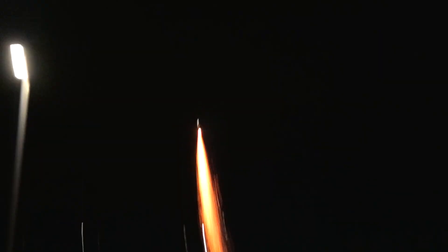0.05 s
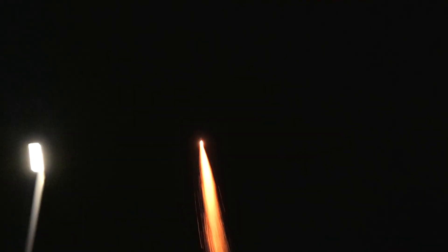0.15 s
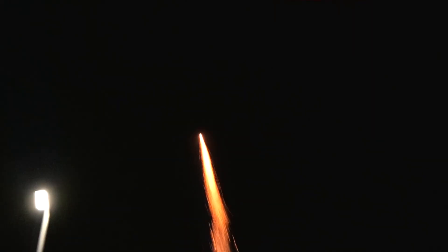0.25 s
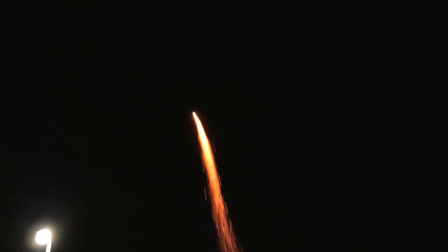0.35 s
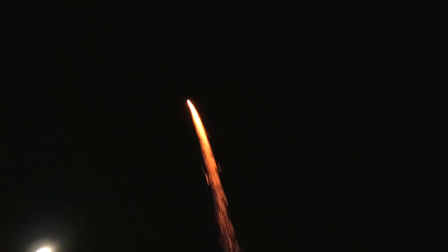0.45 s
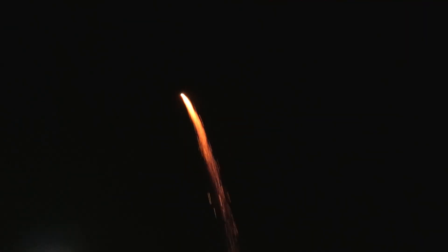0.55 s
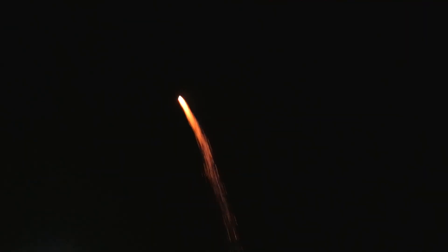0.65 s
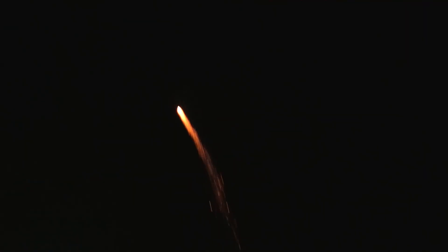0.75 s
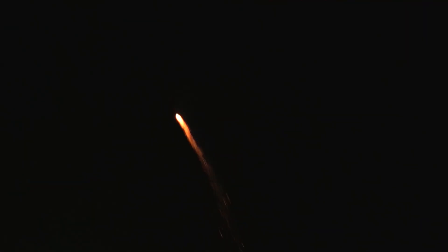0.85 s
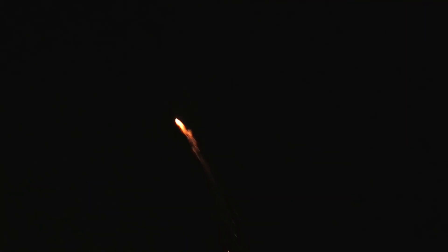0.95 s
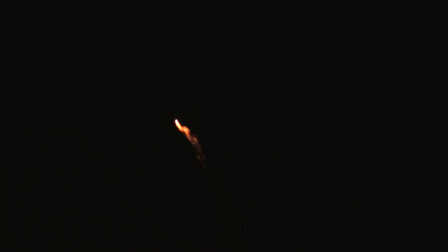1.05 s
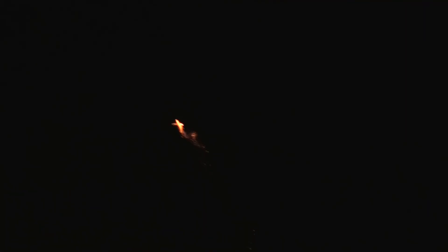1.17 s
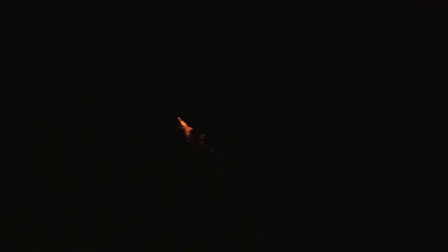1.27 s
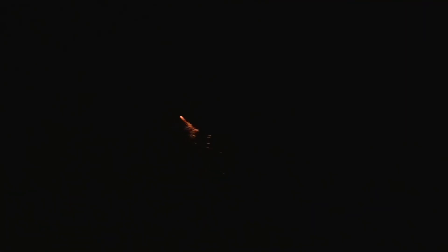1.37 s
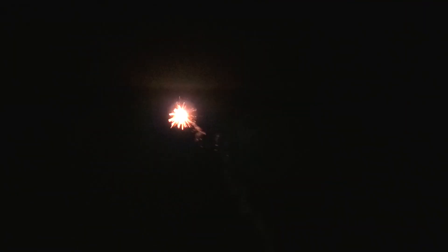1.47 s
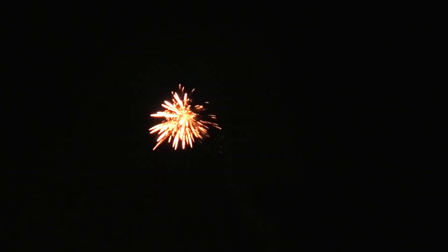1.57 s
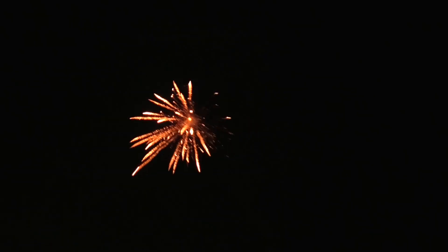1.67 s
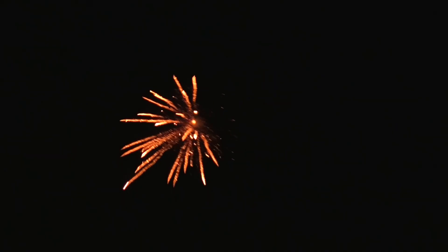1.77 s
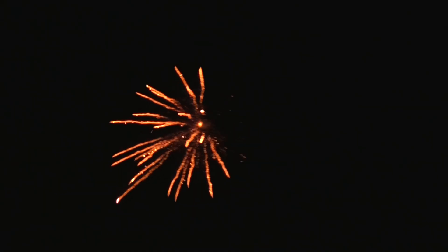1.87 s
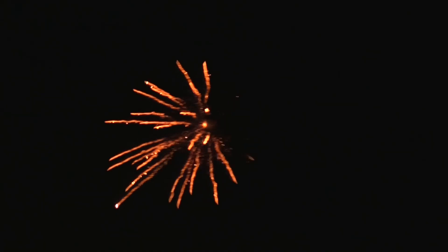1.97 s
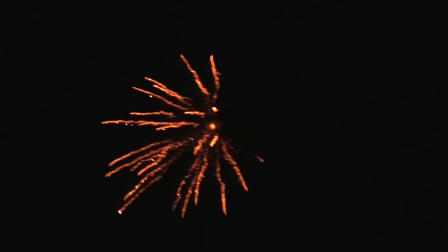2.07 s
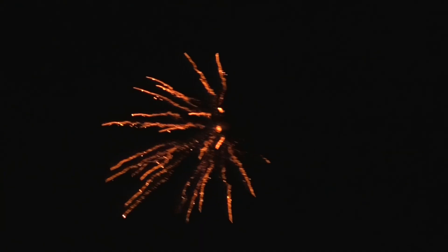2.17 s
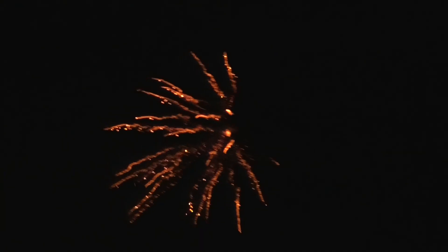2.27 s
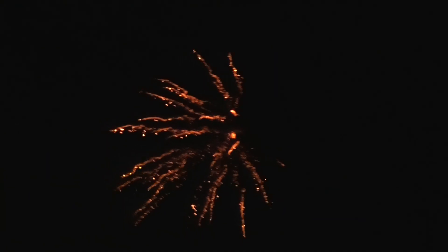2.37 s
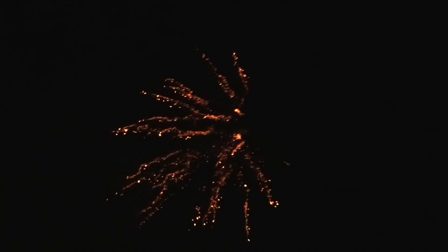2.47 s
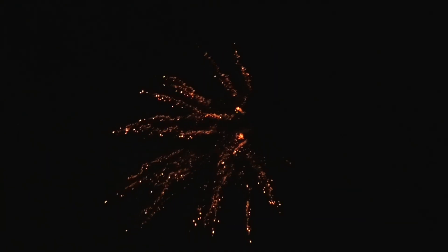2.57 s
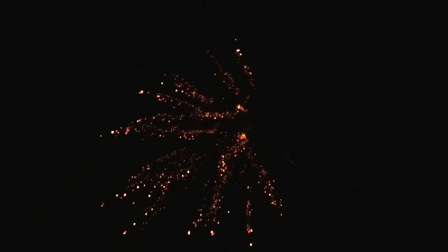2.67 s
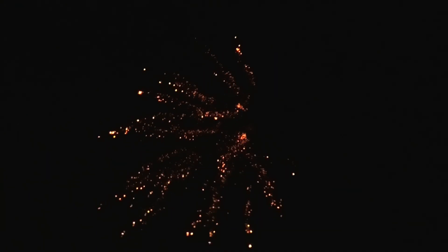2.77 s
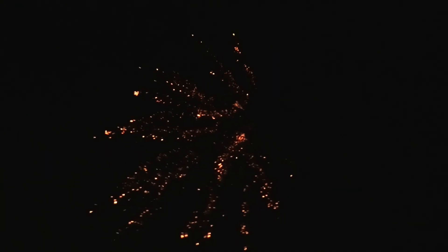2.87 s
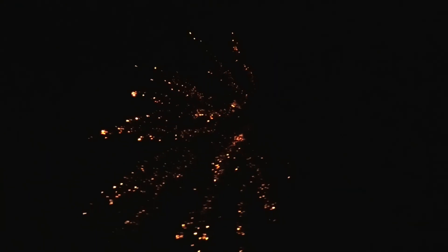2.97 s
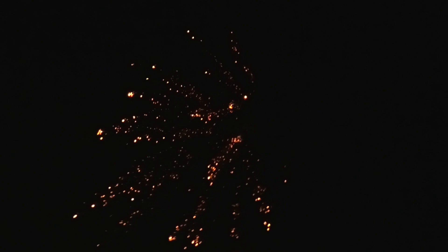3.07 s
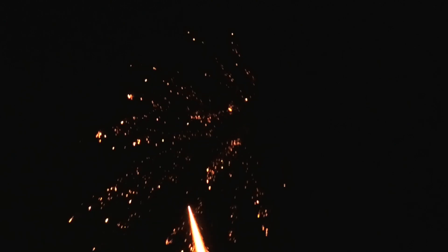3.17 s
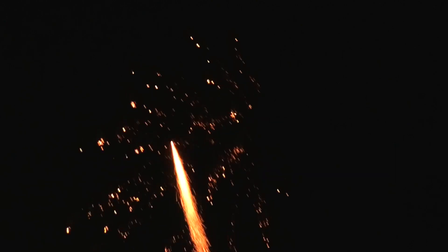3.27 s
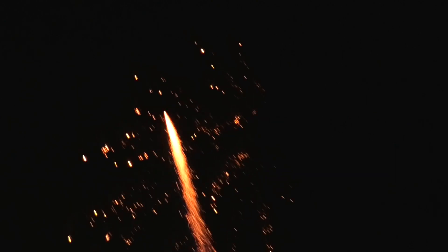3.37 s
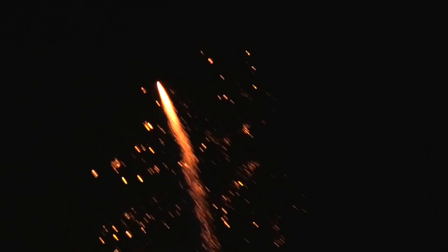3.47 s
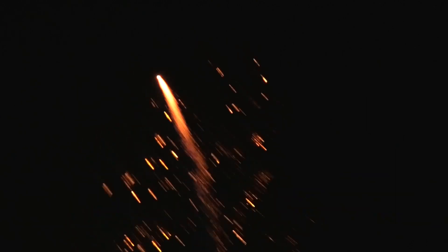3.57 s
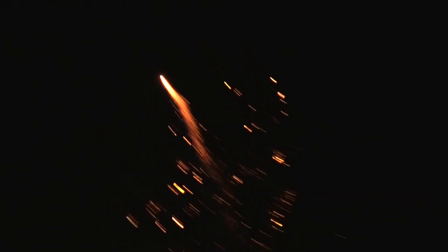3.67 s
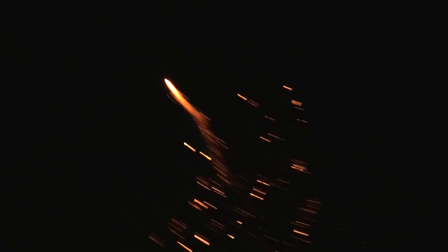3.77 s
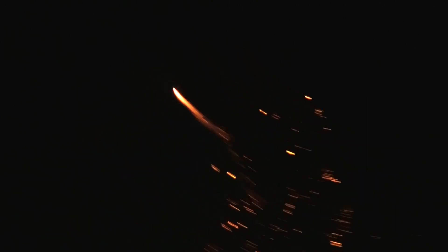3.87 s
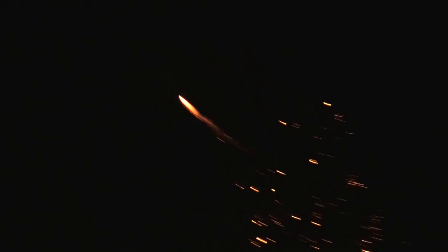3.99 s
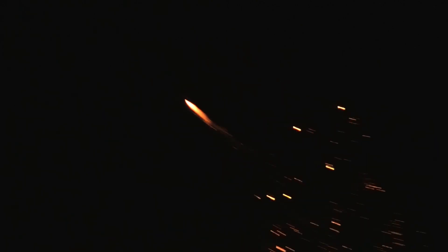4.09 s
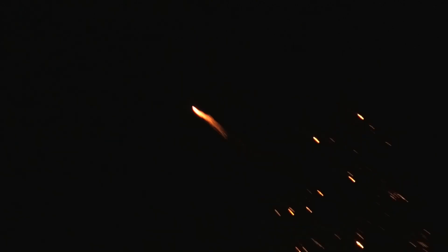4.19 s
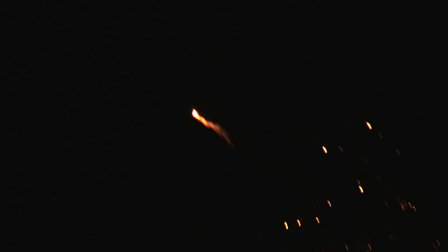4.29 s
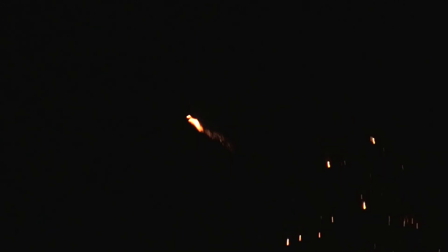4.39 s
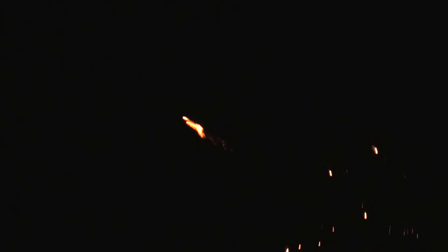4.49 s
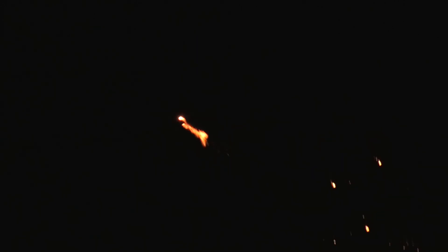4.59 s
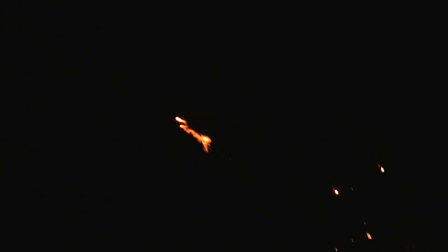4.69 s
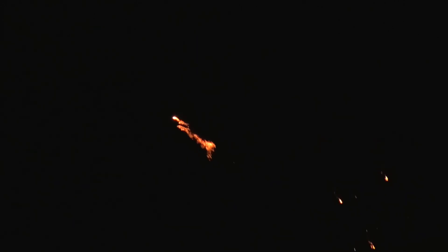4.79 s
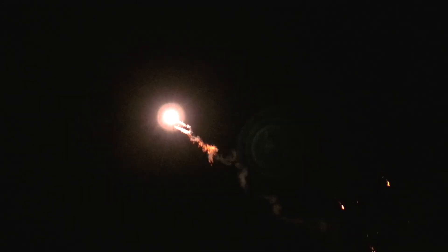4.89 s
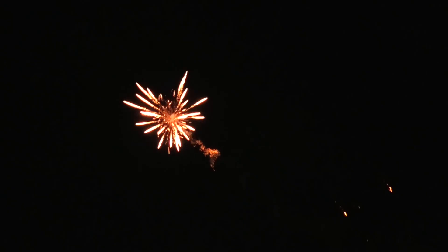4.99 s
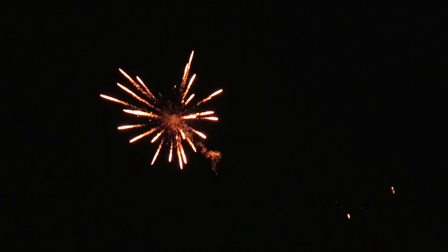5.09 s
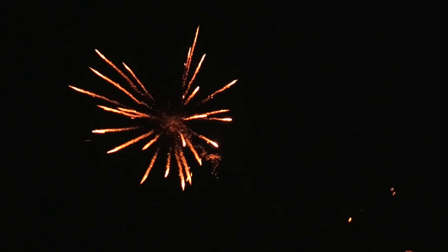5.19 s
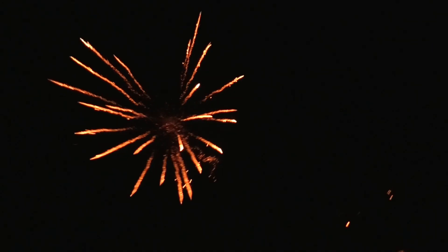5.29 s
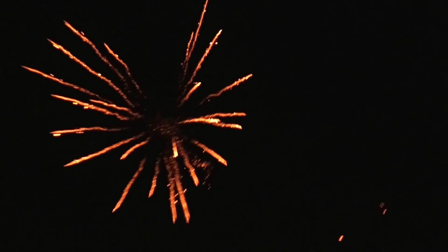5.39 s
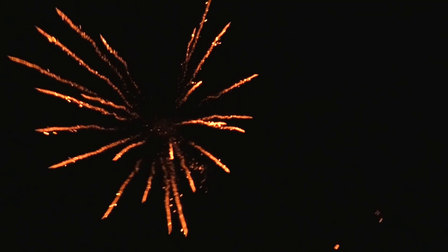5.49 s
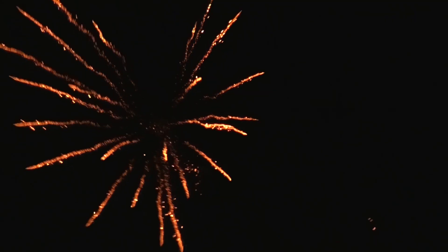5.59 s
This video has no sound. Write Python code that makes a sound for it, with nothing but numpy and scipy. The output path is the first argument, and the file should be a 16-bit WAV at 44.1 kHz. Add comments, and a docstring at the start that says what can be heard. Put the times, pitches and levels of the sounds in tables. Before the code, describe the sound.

Outdoor night fireworks through one wind-rocked microphone, the same on both sides. At 0 s a rocket's bright sizzling exhaust jumps to full strength, holds for about half a second, then fades quickly by 0.9 s, leaving faint town hum, low wind rumble and weak puffs of hiss. At 1.6 s a shell bursts overhead: an abrupt, heavily clipped bang that briefly chokes the input, followed by irregular pops and wall slaps until about 2.1 s and a rolling echo that loses treble. From 2.4 s another rocket rises out of the tail, its whoosh sweeping upward to a loud peak near 2.9 s; a soft low tone dips briefly at 3.15 s. The patchy hiss surges again near 3.5 and 3.8 s, then thins by 4.7 s, with small pops around 4.35 and 4.57 s. At 5.04 s a second distorted bang cracks, with sharp returns and dull rumble continuing to the cut around 5.6 s.

```python
"""A town at night, heard through one wind-rocked microphone as skyrockets go up.
Exhausts are patchy coloured noise, their surges whoosh as gliding noise bands, and a low tone falls briefly.
Two shells burst overhead and clip the input; each rolls back from walls and houses as noise that dulls.
Lone pops are single pressure cycles; wind and town hum are noise with shaped spectra."""
import sys
import numpy as np
from scipy import signal
from scipy.fft import rfft, irfft, next_fast_len
from scipy.io import wavfile
from scipy.ndimage import uniform_filter1d, minimum_filter1d, map_coordinates

SR = 44100
rng = np.random.default_rng(int(sys.argv[2]) if len(sys.argv) > 2 else 0)


def to_wav(sig):
    """Store sig (one row per channel, or 1-D mono) as 16-bit WAV at the path in sys.argv[1].

    Samples outside -1..1 are clipped; the rate is SR.
    """
    pcm = np.clip(np.atleast_2d(sig), -1, 1) * 32767
    pcm = np.round(pcm).astype(np.int16)
    wavfile.write(sys.argv[1], SR, pcm.T)  # frames by channels


N = 248706

# bursts overhead: (start [s], shock front [ms], push [ms], swing size [full scale], swing decay [ms],
# recoil size [full scale])
OVERHEAD_BURSTS = [(1.61706, .45, .97, 21, 8, .88), (5.03705, .38, 1.12, 6, 11, .62)]
# surges as a rocket pulls away: (peak [s], rise [s], fall [s], hiss swell [dB], whoosh peak level [dB],
# whoosh centre at the peak [Hz], glide [octaves per s])
ROCKET_SURGES = [(0.251, .09, 0.33, 3, -45, 3550, -1.5), (2.872, .15, 0.048, 6, -20, 3000, 7.5),
                 (3.555, .12, 0.13, 8.5, -35, 2600, 4), (3.788, 0.1346, 0.35, 2.5, -20, 9940, -0.9),
                 (3.95, 0.19, 0.84, 3.5, -34, 3540, -0.6)]


def amp(db):
    """Decibels to amplitude."""
    return 10 ** (np.asarray(db) / 20)


def unit(x):
    """Scale to an rms of 1."""
    return x / np.sqrt(np.mean(x ** 2) + 1e-20)


def along(points, hz):
    """Read (frequency [Hz], value) points on a log frequency axis."""
    f, v = np.transpose(points)
    return np.interp(np.log(hz + 1), np.log(f + 1), v)


def curves(spans):
    """One value per sample for each column; the first column is silent outside the spans."""
    knots_s, *columns = np.transpose(np.vstack(spans))
    t = np.arange(N) / SR
    columns = [np.interp(t, knots_s, column) for column in columns]
    # each span holds on for 1/18 s after its last point
    on = np.any([(t >= rows[0][0]) & (t <= rows[-1][0] + 1 / 18) for rows in spans], axis=0)
    return [np.where(on, columns[0], -200)] + columns[1:]


def filtered(x, response):
    """Multiply the spectrum by a complex response of frequency."""
    m = next_fast_len(N + SR // 2)
    return irfft(rfft(x, m) * response(np.fft.rfftfreq(m, 1 / SR)), m)[:N]


def rush(spectrum, patchy_db, grain_db=0):
    """Coloured noise of rms 1 with patches of random gain and, if grainy, spiky samples."""
    grain = rng.standard_normal(N // 64 + 1).repeat(64)[:N]
    spiky = rng.standard_normal(N) * amp(grain_db * grain)
    z = signal.stft(spiky, nperseg=512)[2]
    patches = uniform_filter1d(rng.standard_normal(z.shape), size=8, axis=0)
    patches = uniform_filter1d(patches, size=8, axis=1)
    x = signal.istft(z * amp(patchy_db * unit(patches)), nperseg=512)[1][:N]

    def colour(hz):
        outside = (hz < spectrum[0][0]) | (hz > spectrum[-1][0])
        return amp(along(spectrum, hz) - 90 * outside)
    return unit(filtered(x, colour))


def wobble(rate):
    """A smooth random curve with rate knots a second."""
    knots = rng.standard_normal(int(N * rate / SR) + 4)
    return map_coordinates(knots, [np.arange(N) * rate / SR])


def away(peak_s, rise_s, fall_s):
    """Squared distance from a peak: 0 on it, 1 one rise before or one fall after."""
    t = np.arange(N) / SR - peak_s
    return np.where(t < 0, t / rise_s, t / fall_s) ** 2


def layers(level_db, roar_db, hiss_db):
    """Power of hiss, roar, sizzle and fizz: a jet that gains roar loses top."""
    # 0.31 dB of fizz lost per dB of roar, up to 11 dB of roar
    fizz_db = -1.5 - 0.31 * np.minimum(roar_db, 11)
    return amp(level_db + np.array([hiss_db - 3, roar_db - 3.5, np.full(N, 1.06), fizz_db])) ** 2


def jets():
    """Turbulent exhaust; its mirror in the ground cuts a comb of notches, deepest before lift-off."""
    # each volley in flight, before fixed layer trims: (time [s], sizzle level [dB],
    # roar over sizzle [dB], hiss over sizzle [dB])
    volleys = [
        [(0, -27, -2.5, 1.5), (.042, -18, -3, -1), (.254, -19.5, -3, -1.5), (.516, -24.5, -3, 0.5),
         (.664, -31.5, 5.5, 4), (.78, -46, 13.5, 5.5), (.87, -56.5, 13, 3), (.96, -66, 15, 4),
         (1.1, -61, 10, -3)],
        [(2.3, -87, 4, 6), (2.42, -51, 9, 9), (2.6, -35, 5, 8), (2.69, -22.5, 1, 4.5), (2.85, -17, -2.5, 0),
         (3.0, -23, -2, 2), (3.15, -19.5, -5.5, -1.5), (3.43, -25, -0.5, 3), (3.52, -19.5, 2, -0.5),
         (3.66, -22, -1.5, 1), (3.8, -26, 3.5, 1.5), (4.0, -27.5, 0, 0.5), (4.33, -28.5, 1, -0.5),
         (4.42, -32, 1.5, 2), (4.5, -31, 0, 3.5), (4.61, -36.5, 8.5, 2), (4.72, -50.5, 14.5, 2.5),
         (4.95, -63.5, 7, 2)],
    ]
    # faint far puffs of exhaust, before the same trims: (peak [s], rise from 20 dB under the peak [s],
    # fall to 20 dB under it [s], sizzle level [dB], roar over sizzle [dB], hiss over sizzle [dB])
    puffs = [(1.19, 0.065, 0.11, -45, 12, 8.5), (1.37, 0.16, 0.15, -54.5, 2.7, 4),
             (1.52, 0.11, 0.12, -46, 2.6, 1)]
    # strength of the mirror in the ground: (time [s], strength [0-1])
    ground_mirror = [(2.2, 0), (2.3, .85), (2.64, 0.44), (2.76, 0.17)]
    # colours of the four exhaust layers: (frequency [Hz], relative level [dB])
    hiss_colour = [(1500, -14), (2400, -3), (5500, -10), (7500, -29)]
    roar_colour = [(90, -37), (250, -14), (500, -10), (1000, -3.5), (2000, -6.5), (2800, -11)]
    sizzle_colour = [(4500, -7.5), (6000, -2), (9000, 0), (11000, -27)]
    fizz_colour = [(7500, -47), (9500, -2.5), (12000, -4.5), (14000, -12), (16000, -17)]

    power = layers(*curves(volleys))
    for s, rise, fall, db, roar_db, hiss_db in puffs:
        power = power + layers(db - 20 * away(s, rise, fall), np.full(N, roar_db), np.full(N, hiss_db))
    hiss, roar, sizzle, fizz = np.sqrt(power)
    swell_db = sum(db * np.maximum(1 - away(s, rise, fall), 0) for s, rise, fall, db, *_ in ROCKET_SURGES)
    jet = hiss * amp(swell_db) * rush(hiss_colour, 1.1, grain_db=1.0)
    jet = jet + roar * rush(roar_colour, 0.42)
    jet = jet + sizzle * rush(sizzle_colour, 0.94, grain_db=0.5)
    jet = jet + fizz * rush(fizz_colour, 1.1, grain_db=0.5)
    mirror = np.clip(np.interp(np.arange(N) / SR, *np.transpose(ground_mirror)), 0, 1)
    mirror_delay_s = 0.00156
    comb = jet + mirror * np.roll(jet, round(mirror_delay_s * SR))
    return comb / np.sqrt(1 + mirror ** 2)


def town():
    """The town's steady hum: low-heavy noise at one level throughout."""
    # colour of the hum: (frequency [Hz], relative level [dB])
    hum_colour = [(59, -9), (100, -10), (244, -17), (1060, -11.5), (1390, -16.5), (1800, -19), (4200, -24),
                  (8110, -28), (11000, -40), (16000, -65)]
    return amp(-48.5) * rush(hum_colour, 0.85)


def wind():
    """Gusts rock the membrane mostly below hearing, rumble and flutter above; lost while a burst drives it."""
    # gusts between the bursts: (time [s], rumble [dB], rocking over rumble before smoothing and stop [dB],
    # flutter over rumble before its wobble [dB])
    gusts = [
        [(0, -27, 24.5, 3), (.082, -36, 15.5, -7), (.35, -52, 27, -10), (.7, -44, 13.5, -8),
         (1.1, -40, 13.5, -28), (1.55, -32, 11, -14)],
        [(1.78, -47, 42, -6), (2.05, -39.5, 23.5, 1.5), (2.34, -26.5, 19, -12), (2.59, -29, 26.5, -2.5),
         (2.9, -59.5, 19, 5), (3.1, -54.5, 22.5, 2), (3.45, -47, 21, -20), (3.54, -36, 18, 0),
         (3.64, -45.5, 17, -8), (4.2, -37.5, 18, -16), (4.5, -30.5, 3, -21), (4.65, -47, 24.5, -9),
         (4.84, -34.5, 23.5, -27), (4.96, -34, 27, -17)],
        [(5.18, -37.5, 29, -17), (5.3, -45, 20, -12), (5.46, -33.5, 21, -7), (5.64, -35.5, 17, -21)],
    ]
    # colours of rocking, rumble and flutter: (frequency [Hz], relative level [dB])
    rock_colour = [(2, -6), (5, 2.5), (10, -5), (20, -16), (30, -45)]
    rumble_colour = [(18, -26), (30, -1.5), (60, -5), (120, -23)]
    flutter_colour = [(60, -10), (95, 1), (200, -6.5), (300, -16)]

    gust_db, rock_db, flutter_db = curves(gusts)
    rock = uniform_filter1d(amp(gust_db + rock_db), size=SR // 25) * rush(rock_colour, 0)
    flutter = amp(flutter_db + wobble(8.7)) * rush(flutter_colour, 2.2)
    stop = 0.43  # the membrane stiffens near its stop
    return stop * np.tanh(rock / stop) + amp(gust_db) * (rush(rumble_colour, 1.3) + flutter)


def whoosh():
    """Noise shifted up to a gliding centre; a high whoosh gets a wider band."""
    t, out = np.arange(N) / SR, np.zeros(N)
    for s, rise, fall, _, db, centre_hz, glide in ROCKET_SURGES:
        moving_hz = centre_hz * 2 ** (glide * np.clip(t - s, -rise, fall))
        turn = 2 * np.pi * np.cumsum(moving_hz) / SR
        width_hz = 350 if centre_hz < 6000 else 1300
        low_band = [(5, 0), (width_hz, 0), (2 * width_hz, -20)]
        band = sum(rush(low_band, 0) * wave(turn) for wave in (np.cos, np.sin))
        # 26 dB under its peak at both ends
        out = out + amp(db - 26 * away(s, rise, fall)) * band
    return out


def pops():
    """Each pop is one pressure cycle, front first, rounded by the distance."""
    # single pops, from lone walls and farther shells: (start [s], level before a shared lift [dB], pitch [Hz])
    lone_pops = [(1.4364, -36, 560), (1.7267, -6, 684), (1.7479, -12, 520), (1.7691, -17, 840),
                 (1.7786, -9, 556), (1.854, -20, 750), (1.892, -12, 860), (1.937, -18, 564),
                 (1.991, -15, 650), (2.0984, -20, 390), (2.4636, -16, 1700), (2.541, -15, 790),
                 (4.3516, -8.5, 650), (4.3643, -19.5, 696), (4.5678, -22.5, 695), (5.162, -11, 1200),
                 (5.17, -15, 700), (5.201, -17, 1110), (5.252, -19, 1490), (5.4788, -21, 2540)]
    out, t = np.zeros(N + SR), np.arange(SR // 100) / SR
    lift_db = 5
    for s, db, hz in lone_pops:
        cycles = hz * t
        swing = np.sin(2 * np.pi * cycles ** 1.02)
        rounded_front = np.tanh(cycles / 0.27)
        fade = np.exp(-(cycles / 1.08) ** 4)
        out[round(s * SR):][:len(t)] -= amp(db + lift_db) * swing * rounded_front * fade
    return out[:N]


def bursts():
    """Shock front, push, then the slow swing and recoil of the overloaded capsule."""
    # first returns off the ground, strong enough to leave the rail: (start [s], length [ms])
    ground_returns = [(1.6278, .16), (1.62835, .17), (5.04875, .62)]
    t = np.arange(N) / SR
    push_size = 40  # far over full scale
    out = sum(push_size * ((t >= s) & (t < s + ms / 1000)) for s, ms in ground_returns)
    for s, front_ms, push_ms, swing, swing_ms, recoil in OVERHEAD_BURSTS:
        u = np.maximum(t - s, 0)
        slow = recoil * np.exp(-u / .12) - swing * np.exp(-1000 * u / swing_ms)
        push = push_size * ((u > front_ms / 1000) & (u < (front_ms + push_ms) / 1000))
        out = out + (t >= s) * (slow + push)
    return out


def roll_level():
    """Near walls answer at once and die fast, the houses arrive later, the far town swells and lingers."""
    # rolling echoes, before the overall lift: (start [s], near walls [dB], houses at full level [s],
    # houses [dB], far town [dB])
    rolls = [(1.634, -18.5, 1.725, -25, -26.5), (5.045, -18, 5.14, -24.5, -28.5)]
    near_db_per_s, houses_db_per_s, far_db_per_s = 152, 65, 2.5
    far_swell_s, roll_s = .12, 1.6
    houses_rise_s, houses_hold_s = 0.034, 0.025
    t, power = np.arange(N) / SR, np.zeros(N)
    for s, near_db, houses_s, houses_db, far_db in rolls:
        u = np.maximum(t - s, 0)
        near = (t >= s) * amp(near_db - near_db_per_s * u)
        rise = np.clip(1 + (t - houses_s) / houses_rise_s, 0, 1)
        houses = rise * amp(houses_db - houses_db_per_s * np.maximum(t - houses_s - houses_hold_s, 0))
        far = amp(far_db - far_db_per_s * u - 20 * (u / roll_s) ** 8) * np.tanh((u / far_swell_s) ** 2)
        power = power + near ** 2 + houses ** 2 + far ** 2
    lumps_db = 1.07 * wobble(18)
    return np.sqrt(power) * amp(lumps_db)


def echoes():
    """Many walls return each burst: dense grains that lose treble with the length of their path."""
    # colour of the early echoes: (frequency [Hz], relative level [dB])
    blast_colour = [(59, -57), (100, -10), (721, 1.5), (1150, -7), (1550, -6), (1830, -11.5), (3700, -17),
                    (4870, -18), (10200, -21), (16000, -37)]
    # air dulls late echoes: (frequency [Hz], loss [dB per s])
    air_loss = [(100, 14.5), (1000, 4), (3500, 10), (8000, 45.5), (12000, 64), (16000, 120)]
    hz, t, z = signal.stft(rush(blast_colour, 1.16, grain_db=1.5), SR, nperseg=256)
    # time since the latest burst; 9 s stands for none yet
    since = np.min([np.where(t >= s, t - s, 9) for s, *_ in OVERHEAD_BURSTS], axis=0)
    dulled = z * amp(-along(air_loss, hz)[:, None] * since)
    roll = signal.istft(dulled, SR, nperseg=256)[1][:N]
    return amp(3.5) * roll_level() * roll


def hoot():
    """One brief soft low sine whose pitch falls."""
    middle_s, half_s, middle_hz, fall_hz_per_s = 3.158, 0.06, 108.4, 570
    u = np.arange(N) / SR - middle_s
    level_db = -34 - 25 * (u / half_s) ** 2
    return amp(level_db) * np.sin(2 * np.pi * (middle_hz - fall_hz_per_s * u / 2) * u)


def through_port(x):
    """The microphone port resonates: each peak or dip is a second-order bell on the spectrum."""
    # port peaks and dip: (centre [Hz], width [Hz], boost [dB])
    port_bells = [(1509, 202, 11), (3150, 750, 3.5), (3520, 367, 10), (4200, 640, -2), (5380, 310, 4.5),
                  (7160, 1200, 2)]

    def response(f):
        total = 1
        for centre, width, db in port_bells:
            total = total + (amp(db) - 1) * 1j * f * width / (centre ** 2 - f ** 2 + 1j * f * width)
        return total
    return filtered(x, response)


def scene():
    """Airborne sound passes the port; wind and bursts drive the capsule directly."""
    airborne = jets() + town() + whoosh() + pops() + echoes() + hoot()
    heard = amp(-1.5) * through_port(airborne) + wind() + bursts()
    return np.array([heard, heard])


def record(dry):
    """The input clips; its headroom sags within milliseconds of an overload; a capacitor bleeds steady pressure."""
    hold, rail = SR // 10, .55  # samples an overload is held, sagged ceiling
    over = np.abs(dry[0]) > .72
    # hold each overload forward in time
    held = -minimum_filter1d(-1. * over, size=hold, origin=(hold - 1) // 2)
    keep = np.exp(-1 / (.0022 * SR))  # 2.2 ms sag and recovery
    top = 1 - (1 - rail) * signal.lfilter([1 - keep], [1, -keep], held)
    x = np.clip(dry[0], -top, top)
    x = filtered(x, lambda hz: 1j * hz / (3.5 + 1j * hz))
    # only the upper side is held near the sagged ceiling
    x = np.clip(x, -1, 1.06 * top)
    top_hz = 15750  # steep upper edge
    x = filtered(x, lambda hz: 1 / (1 + (hz / top_hz) ** 800))
    return np.clip([x, x], -1, 1)


dry = scene()
out = record(dry)
to_wav(out)
```